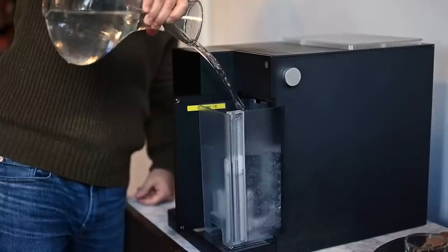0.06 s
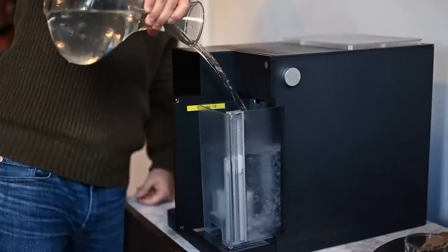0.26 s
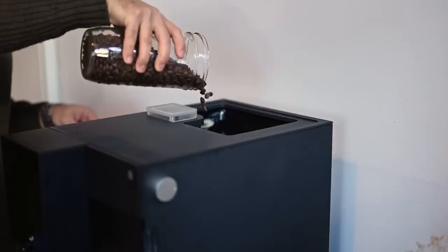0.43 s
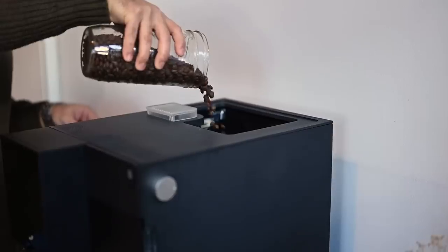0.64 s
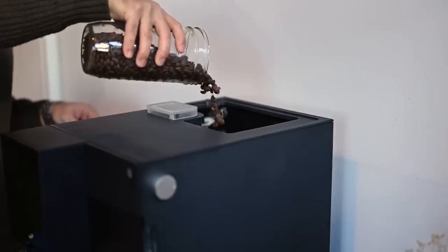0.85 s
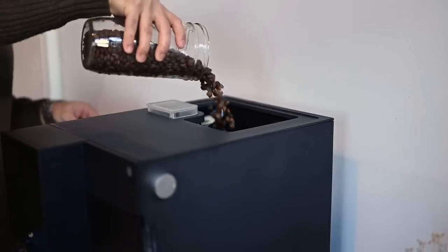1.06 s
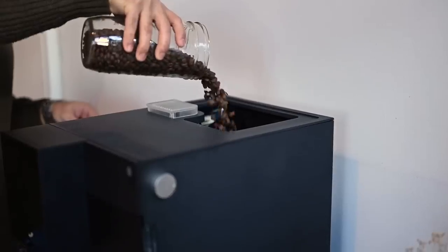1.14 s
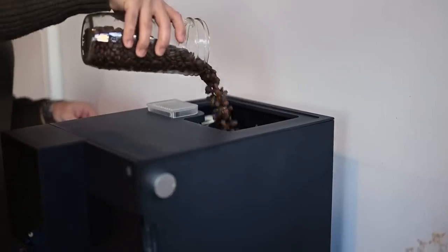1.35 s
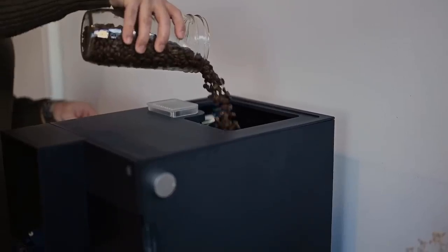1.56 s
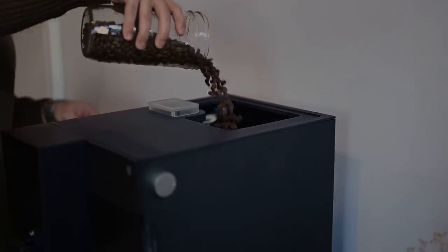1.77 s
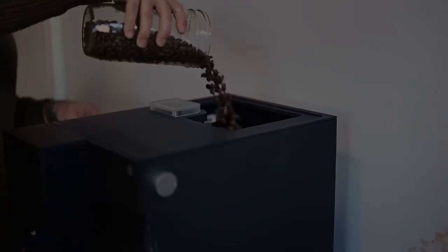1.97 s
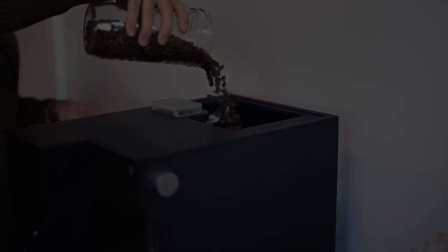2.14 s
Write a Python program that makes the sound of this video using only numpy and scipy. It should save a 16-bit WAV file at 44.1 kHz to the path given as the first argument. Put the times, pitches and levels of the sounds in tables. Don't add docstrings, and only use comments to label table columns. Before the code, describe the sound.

Coffee beans pour from a glass jar into a plastic hopper, clattering hard, then thinning to ticks

```python
import sys
import numpy as np
from scipy import signal
from scipy.fft import rfft, irfft
from scipy.io import wavfile

SR = 44100
rng = np.random.default_rng(int(sys.argv[2]) if len(sys.argv) > 2 else 0)


def linear_from_db(decibels):
    return 10 ** (np.asarray(decibels, float) / 20)


def store_wav(level_fs):
    pcm = np.round(np.clip(np.atleast_2d(level_fs), -1, 1) * 32767)
    wavfile.write(sys.argv[1], SR, pcm.T.astype(np.int16))


N = 97461

# (time [s], level [dB])
WATER = [(0, -50.5), (.06, -58), (.08, -51), (.13, -52), (.2, -51), (.222, -52.5), (.27, -48), (.32, -52.5),
         (.335, -54), (.37, -74), (.4, -55)]
# (frequency [Hz], gain [dB])
SPLASH = [(100, -3), (300, -25), (480, 1.5), (800, -4), (1300, -3.5), (4300, 0), (6000, -19), (15500, -25)]
# (frequency [Hz], width [Hz], gain [dB])
TANK = [
    (312, 9.8, -1.5),
    (470, 40, 1.5),
    (1220, 130, -11),
    (1610, 33, -11),
]
# (time [s], level [dB], pitch [Hz], time to fall 60 dB [s])
GLUGS = [(.003, -50, 470, .3), (.076, -44, 3820, .04), (.106, -50, 480, .1), (.16, -49, 470, .2),
         (.217, -42, 3800, .05), (.22, -38, 800, .034), (.223, -42, 310, .46), (.23, -41, 450, .12),
         (.233, -37, 1285, .05), (.259, -41, 480, .2), (.265, -45, 1450, .04), (.29, -42, 680, .084),
         (.288, -42, 430, .2), (1.52, -54, 415, .08), (1.906, -47.5, 370, .06), (1.926, -48, 380, .07)]
# (time [s], peak [dB], ring [Hz])
DROPS = [(0.009, -56, 7840), (0.0233, -63, 12230), (0.0368, -57, 12210), (0.0441, -57, 5150),
         (0.0509, -48, 5400), (0.0826, -48, 12400), (0.0894, -59, 6370), (0.0989, -51, 13720),
         (0.1336, -62, 5400), (0.1411, -64, 6360), (0.1677, -49, 5580), (0.1743, -52, 12000),
         (0.2107, -55, 5840), (0.216, -52, 7000), (0.2242, -53.5, 10200), (0.232, -59, 8010),
         (0.2541, -57, 5230), (0.2745, -49, 7770), (0.2809, -52, 6220), (0.2971, -49, 7390)]
# (time [s], level [dB])
CLINKS = [
    (0.321, -45),
    (1.24, -59),
    (1.56, -57),
    (1.8, -57),
    (1.84, -54),
    (1.97, -56),
]

# (time [s], level [dB])
CLATTER = [(.37, -45.5), (.43, -33.5), (.5, -29), (.53, -27.5), (.7, -27), (.9, -33), (1.0, -37.5),
           (1.2, -41), (1.45, -41.5), (1.5, -39.5), (1.7, -41), (1.9, -43.5), (2.1, -47), (2.21, -49)]
# (time [s], peak [dB], ring [Hz])
FIRST_BEANS = [
    (0.335, -22.5, 3640),
    (0.3537, -20.5, 4000),
    (0.3744, -18.5, 2900),
    (0.3828, -32, 3880),
    (0.388, -18.5, 3900),
    (0.394, -20.5, 2950),
    (0.409, -12, 3980),
    (0.423, -34, 3620),
    (0.512, -26, 3330),
]
# (time [s], peak [dB], ring [Hz])
POUR_BEANS = [(0.4302, -11.5, 4150), (0.4376, -13, 4020), (0.4604, -8.5, 3570), (0.4776, -16, 3000),
              (0.4864, -16.5, 3360), (0.4925, -14, 3930), (0.5005, -35, 2830), (0.5252, -13, 3340),
              (0.5401, -6, 3730), (0.5545, -12, 3770), (0.564, -10.5, 3830), (0.5694, -21, 3700),
              (0.582, -13, 3380), (0.586, -29, 4000), (0.5996, -12.5, 3730), (0.6126, -16, 3300),
              (0.6227, -14.5, 3300), (0.637, -16, 3840), (0.6463, -17, 3780), (0.6569, -11, 3300),
              (0.6658, -16.5, 3760), (0.674, -18, 2860), (0.6831, -14, 3260), (0.694, -12, 3170),
              (0.7038, -12, 3860), (0.7154, -20.5, 3830), (0.7224, -22, 3680), (0.7308, -22, 3860),
              (0.7389, -22, 3800), (0.7496, -14, 3770), (0.7736, -16, 3100), (0.7804, -11.5, 3250),
              (0.79, -21, 3050), (0.8038, -11, 3140), (0.814, -27, 3340), (0.8312, -23, 3950),
              (0.8384, -22, 3880), (0.856, -19, 2700), (0.8671, -14.5, 3940), (0.8776, -18.5, 3200),
              (0.8843, -14, 4070), (0.8914, -39, 2980), (0.9, -18.5, 3350), (0.9092, -22.5, 3980),
              (0.9196, -17.5, 3670), (0.94, -19, 3730), (0.9507, -23, 3470), (0.9794, -23.5, 3190),
              (0.9917, -22.5, 4180), (1.0066, -25.5, 3380), (1.0228, -29, 2690), (1.0581, -29.5, 2660)]
# (time [s], peak [dB], ring [Hz])
LATE_BEANS = [(1.0784, -21, 3820), (1.1335, -20, 3540), (1.2944, -29, 3860), (1.3366, -15.5, 3830),
              (1.3677, -27, 3780), (1.408, -26, 3740), (1.4237, -21.5, 3850), (1.4664, -17, 3660),
              (1.476, -17, 4200), (1.4889, -17.5, 3080), (1.5044, -25, 3700), (1.526, -19, 3800),
              (1.5973, -18.5, 3100), (1.637, -18.5, 3950), (1.6564, -18, 3020), (1.7063, -20.5, 3800),
              (1.7496, -22, 3770), (1.7749, -19.5, 3660), (1.799, -19, 3580), (1.8204, -20.5, 3900),
              (1.8382, -24, 3420), (1.8562, -12.5, 3550), (1.8684, -24, 3600), (1.9546, -17.5, 3560),
              (1.9835, -38, 3700), (2.041, -17.5, 3620), (2.0887, -27.5, 2260), (2.153, -17.5, 3660),
              (2.2044, -33, 2650)]
# (frequency [Hz], width [Hz], gain [dB])
HOPPER_WALLS = [(674, 143, -0.5), (1100, 130, 0.5), (1415, 270, -5), (1490, 80, -0.5), (1920, 250, -1.5),
                (2110, 110, -8)]
# (frequency [Hz], gain [dB])
SNAP = [(800, -66), (2500, -10), (4300, -2), (5800, -14), (9000, -10), (15500, -17.5)]
# (time [s], gain [dB])
BOOM_FADE = [
    (1.25, -2),
    (1.6, -8.5),
]
# (time [s], gain [dB])
CHUTE_BOOM = [
    (.4, 14),
    (.42, 5),
    (.5, 6),
    (.54, -8),
]
# (time [s], gain [dB])
PANEL_BOOM = [(.4, 2), (.52, -12.5), (.6, 4), (.8, 0.5), (.9, -29), (1.2, -16)]
# (frequency [Hz], gain [dB])
KNOCK = [(500, -23), (1100, -16), (1800, -5.5), (4500, -12.5), (6000, -2), (16000, 10)]

# (time [s], level [dB])
TICKING = [(.37, -77), (.45, -35), (.7, -40), (1.0, -45), (1.4, -43.5), (1.8, -43), (2.15, -40.5),
           (2.21, -48)]
# (time [s], peak [dB], ring [Hz])
TICKS = [(.9022, -28, 14000), (.9411, -21, 15200), (.997, -19, 14200), (1.0632, -25, 13600),
         (1.1832, -30, 12600), (1.258, -26, 13070), (1.2727, -27, 12960), (1.1363, -27, 13300),
         (1.1692, -34, 13000), (1.1973, -20, 15200), (1.32, -31, 14600), (1.3833, -36, 13300),
         (1.5209, -27, 14000), (1.5424, -19.5, 12400), (1.6066, -21, 12200), (1.6601, -27, 14300),
         (1.676, -22, 14400), (1.7315, -22, 14800), (1.816, -27, 11400), (1.8693, -30.5, 10900),
         (1.9041, -18, 10600), (1.927, -37, 12200), (1.9855, -23, 12700), (2.0004, -23, 13600),
         (2.0104, -23, 13200), (2.03, -24, 11400), (2.0388, -19, 12600), (2.049, -27, 13100),
         (2.0797, -27, 12500), (2.108, -25, 12300), (2.121, -20.5, 13000), (2.1304, -21, 15200),
         (2.137, -28, 12800), (2.1524, -31, 14100), (2.1714, -30, 14600)]
# (frequency [Hz], gain [dB])
TICK_COLOUR = [(3000, -21), (8000, -23.5), (10500, -6), (16000, -4)]

# (frequency [Hz], time to fall 60 dB [s])
ROOM_T60 = [
    (300, 0.59),
    (3000, 0.12),
    (15000, 0.011),
]
# (frequency [Hz], gain [dB])
ROOM_TONE = [(15, -54), (32, -9), (60, -8.5), (136, -14), (223, -2.5), (275, -3.5), (366, -7.5), (541, -18),
             (719, -8.5), (900, -11), (1170, -30), (1980, -120)]
# (time [s], gain [dB])
TONE_FADE = [(1.8, 3.5), (2.21, -2.5)]
# (frequency [Hz], gain [dB])
MIC = [(30, -18), (100, -1.5), (3850, 1.5), (4300, -4), (4650, -8), (5600, 2.5), (15700, 3), (16100, -49)]

CHANGE_S = 0.324
BEANS_START_S = 0.372
HIT_RISE_S, HEAP_RISE_S = 0.0014, 0.0009
SINGLE_DB = -5


def curve(points):
    return np.interp(np.arange(N) / SR, *np.transpose(points))


def evened(x):
    return x / np.sqrt(np.mean(x ** 2) + 1e-20)


def read(points, hz):
    f, value = np.transpose(points)
    return np.interp(np.log(hz + 1), np.log(f + 1), value)


def colour(x, points):
    hz = np.fft.rfftfreq(len(x), 1 / SR)
    gain = linear_from_db(read(points, hz)) * (hz < points[-1][0] * 1.04)
    return irfft(rfft(x) * gain, len(x))


def resonate(x, hz, width):
    return signal.lfilter(*signal.iirpeak(hz, hz / width, SR), x)


def resonate_twice(x, hz, width):
    return resonate(resonate(x, hz, width), hz, width)


def scatter(shapes, per_s, spread_db):
    size = linear_from_db(spread_db * np.minimum(rng.exponential(1, N), 4))
    size = size * (rng.random(N) < per_s / SR)
    which = rng.integers(0, len(shapes), N)
    return sum(signal.oaconvolve(size * (which == k), s)[:N] for k, s in enumerate(shapes))


def add(mix, s, sound):
    part = mix[round(s * SR):][:len(sound)]
    part += sound[:len(part)]


def burst(rise_s):
    u = np.arange(900) / SR / rise_s
    return u * np.exp(1 - u) * rng.standard_normal(900)


def room_tone():
    return linear_from_db(-60 + curve(TONE_FADE)) * evened(colour(rng.standard_normal(N), ROOM_TONE))


def glug(hz, t60):
    t = np.arange(7000) / SR
    note = np.sin(2 * np.pi * hz * (t + 0.27 * t * t))
    rough = evened(resonate(rng.standard_normal(7000), hz, 0.18 * hz))
    return linear_from_db(-60 * t / t60) * np.minimum(t / 0.00078, 1) * (note + 0.5 * rough)


def water():
    grains = scatter([burst(0.002) for _ in range(20)], 1800, 2.2)
    level = linear_from_db(curve(WATER))
    ringing = sum(linear_from_db(db) * resonate(grains, hz, width) for hz, width, db in TANK)
    air = linear_from_db(-2) * level * evened(ringing)
    late = np.zeros(N)
    for s, db, hz, t60 in GLUGS:
        add(air if s < CHANGE_S else late, s, linear_from_db(db) * glug(hz, t60))
    before_change = np.clip((CHANGE_S - np.arange(N) / SR) / 0.011, 0, 1)
    return late + air * before_change + level * evened(colour(grains, SPLASH))


def droplets():
    out = np.zeros(N)
    for s, db, hz in DROPS:
        spit = resonate_twice(burst(0.001), hz, 1500)
        add(out, s, linear_from_db(db - 4.5) * spit / abs(spit).max())
    return out


def jar():
    hz, width_hz, t60 = 5860, 140, 0.059
    out, t = np.zeros(N), np.arange(6000) / SR
    for k, (s, db) in enumerate(CLINKS):
        rough = evened(resonate(rng.standard_normal(6000), hz, width_hz))
        ring = np.sin(2 * np.pi * hz * t) + 1.6 * rough
        ring_s = t60 * (4 if k else 1)
        add(out, s, linear_from_db(db - 60 * t / ring_s) * np.minimum(t / 0.0034, 1) * ring)
        add(out, s, linear_from_db(db + 2) * burst(0.0009))
    return out


def clack(hz):
    blow = burst(HIT_RISE_S * rng.uniform(0.14, 1.56))
    return blow + 0.71 * resonate(blow, hz, 0.41 * hz)


def hopper(blows):
    damped = blows * linear_from_db(curve(BOOM_FADE))
    shell = sum(linear_from_db(db) * resonate(damped if hz < 1200 else blows, hz, width)
                for hz, width, db in HOPPER_WALLS)
    shell = shell + linear_from_db(-3) * resonate(blows * (linear_from_db(curve(CHUTE_BOOM)) - 1), 1057, 47.0)
    shell = shell + resonate(blows * linear_from_db(curve(PANEL_BOOM)), 518.4, 34.4)
    shell = shell + linear_from_db(-2.5) * resonate(blows, 3100, 700)
    shell = shell + linear_from_db(0.5) * resonate(blows, 3850, 300)
    no_bass = signal.butter(6, 450, "high", fs=SR, output="sos")
    return signal.sosfilt(no_bass, shell) + colour(blows, SNAP)


def bean_body(blow, hz):
    partner_hz = 0.64 * hz * rng.uniform(0.87, 1.218)
    body = resonate_twice(blow, hz, 1500) + linear_from_db(-5) * resonate_twice(blow, partner_hz, 1500)
    return body / abs(body).max()


def clatter():
    shapes = [clack(hz) for hz in np.geomspace(1300, 6500, num=40)]
    stream = evened(scatter(shapes, 2600, 1.8))
    unit = np.std(hopper(stream))
    blows = stream * linear_from_db(curve(CLATTER)) * (np.arange(N) > BEANS_START_S * SR)
    knocks, own = np.zeros(N), np.zeros(N)
    pour = [(s, db - 0.5, hz) for s, db, hz in POUR_BEANS]
    for s, db, hz in FIRST_BEANS + pour + LATE_BEANS:
        blow = burst(HIT_RISE_S * 1.65 if s < 1.07 else HEAP_RISE_S)
        hits_full = 0.37 < s < 0.4
        add(blows if hits_full else knocks, s, linear_from_db(db + SINGLE_DB - 10.5) * blow)
        add(own, s, linear_from_db(db + SINGLE_DB) * bean_body(blow, hz))
    return hopper(blows + colour(knocks, KNOCK)) / unit + own


def tick(hz):
    puff = resonate_twice(burst(0.0005), hz, 2600)
    return puff / abs(puff).max()


def ticking():
    shapes = [tick(hz) for hz in np.linspace(11400, 16700, num=40)]
    stream = evened(scatter(shapes, 930, 3.5))
    out = stream * linear_from_db(curve(TICKING)) * (np.arange(N) > BEANS_START_S * SR)
    for s, db, hz in TICKS:
        add(out, s, linear_from_db(db - 2) * tick(hz))
    return colour(out, TICK_COLOUR)


def room(x):
    hz, t, z = signal.stft(rng.standard_normal(SR // 2), SR, nperseg=256)
    decay = linear_from_db(-60 * t / read(ROOM_T60, hz)[:, None])
    tail = signal.istft(z * decay, SR, nperseg=256)[1][128:]
    delayed = np.r_[np.zeros(200), tail / np.linalg.norm(tail)]
    return signal.fftconvolve(x, delayed)[:N]


def scene():
    close = droplets() + jar() + clatter() + ticking()
    hiss = linear_from_db(-92) * rng.standard_normal(N)
    return (close + linear_from_db(-13.5) * room(close) + water() + room_tone() + hiss)[None]


def low_pass(x):
    return signal.sosfilt(signal.butter(12, 16560, fs=SR, output="sos"), x)


def record(dry):
    mix = colour(dry[0], MIC)[None]
    return low_pass(mix)


dry = scene()
out = record(dry)
store_wav(out)
```